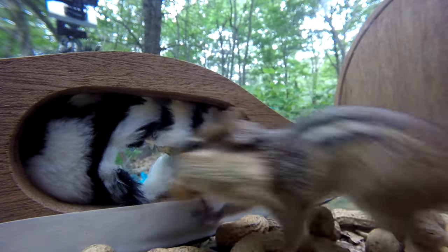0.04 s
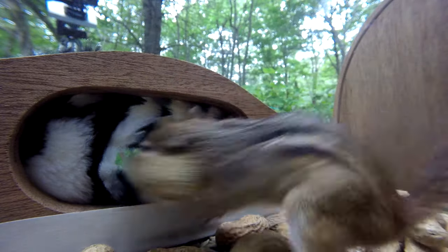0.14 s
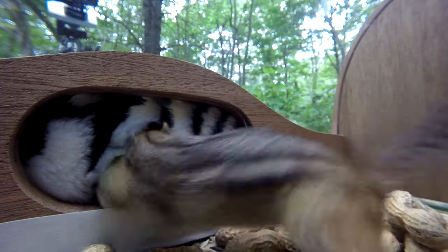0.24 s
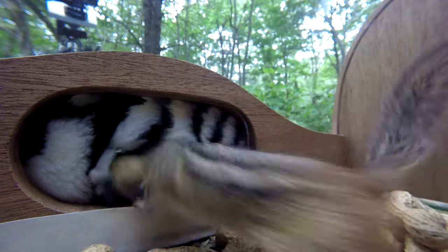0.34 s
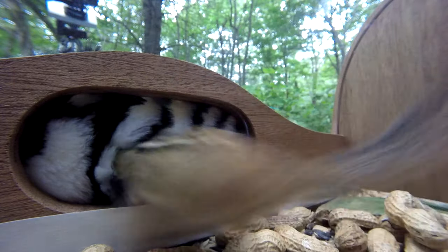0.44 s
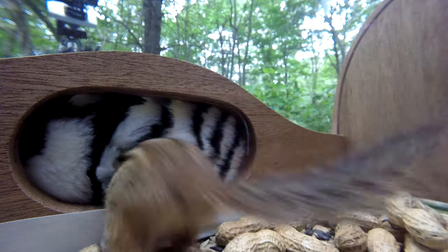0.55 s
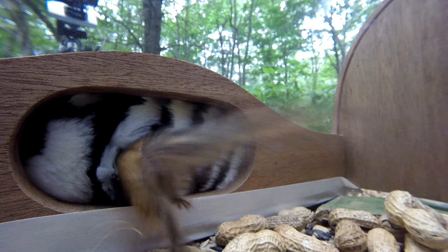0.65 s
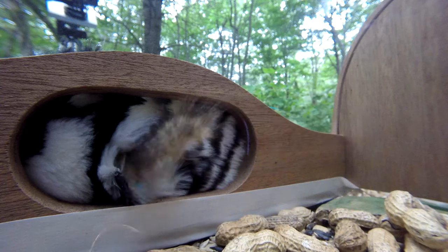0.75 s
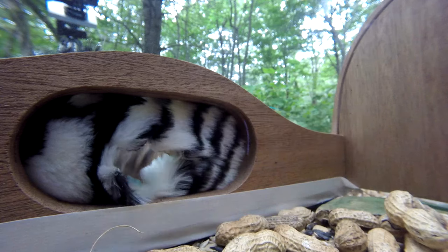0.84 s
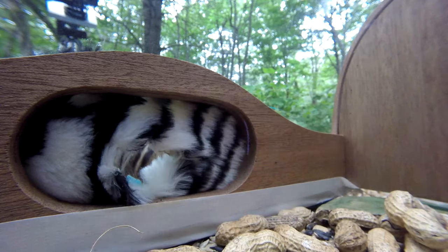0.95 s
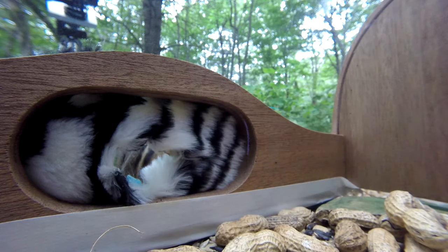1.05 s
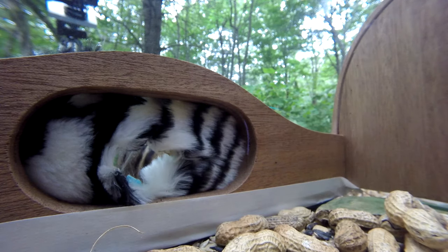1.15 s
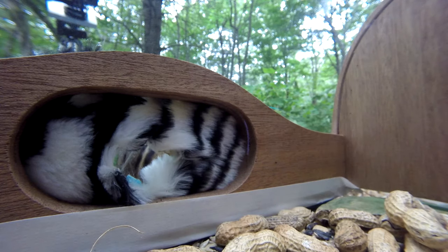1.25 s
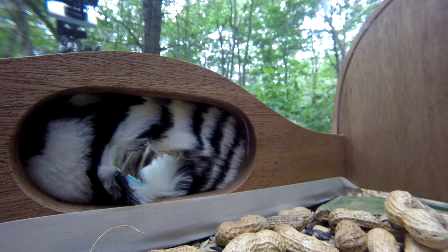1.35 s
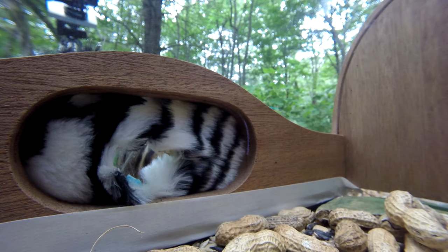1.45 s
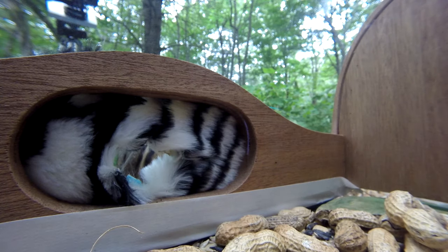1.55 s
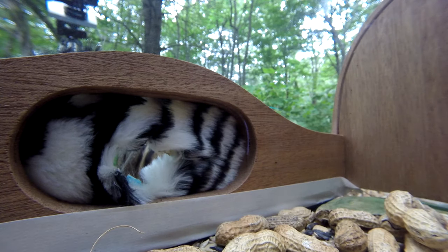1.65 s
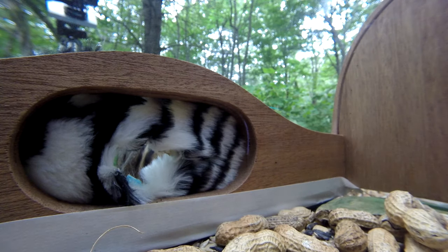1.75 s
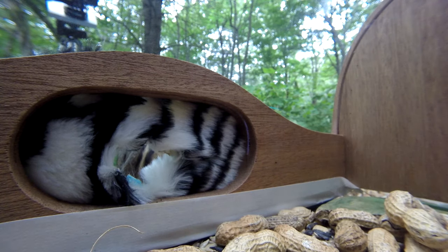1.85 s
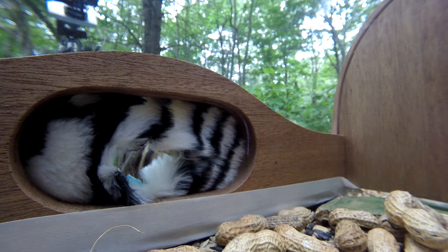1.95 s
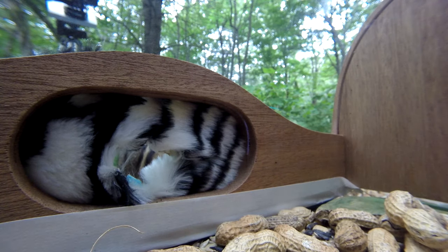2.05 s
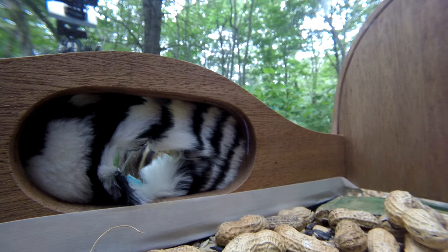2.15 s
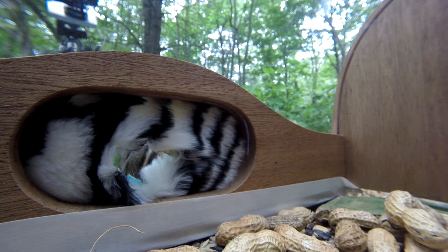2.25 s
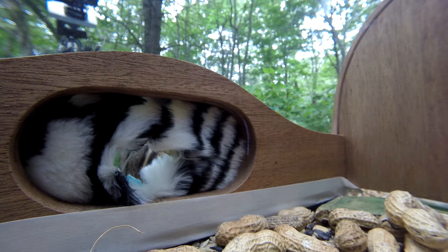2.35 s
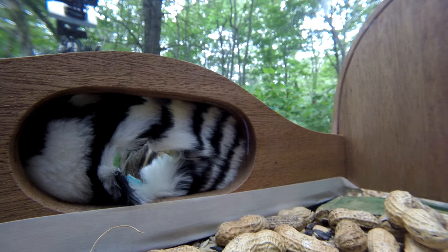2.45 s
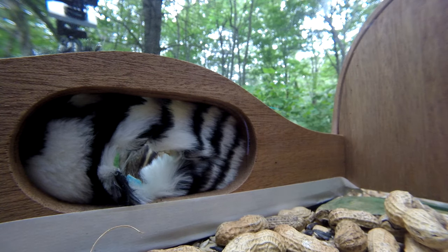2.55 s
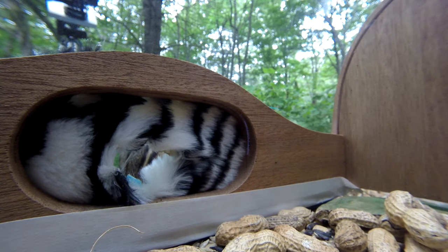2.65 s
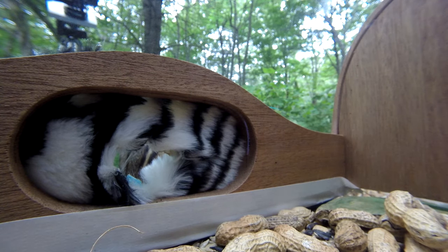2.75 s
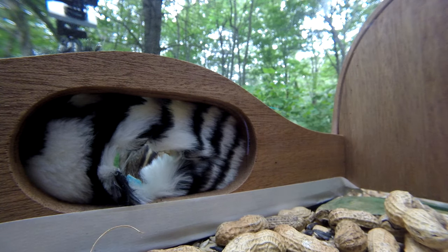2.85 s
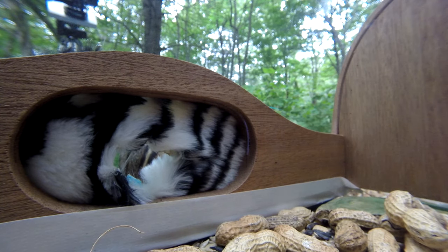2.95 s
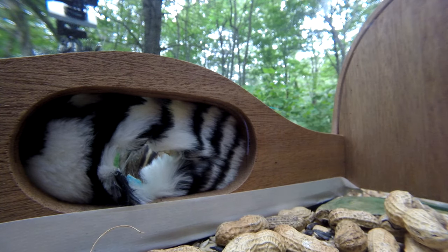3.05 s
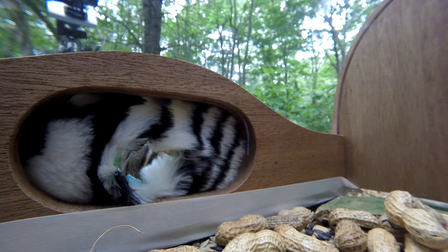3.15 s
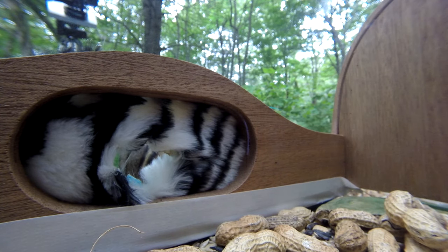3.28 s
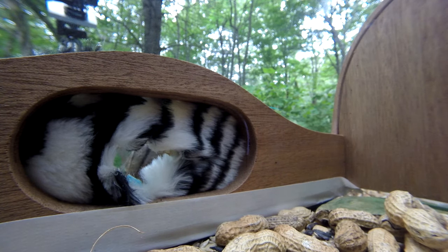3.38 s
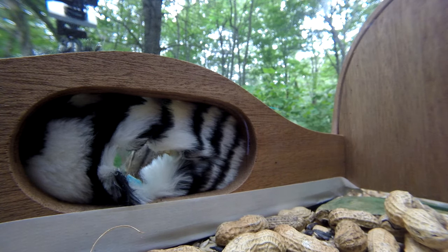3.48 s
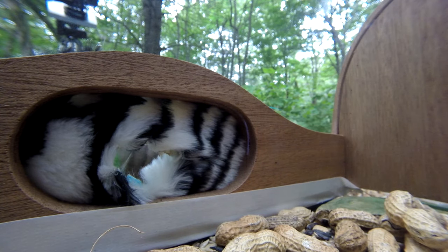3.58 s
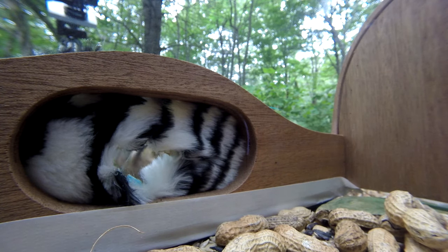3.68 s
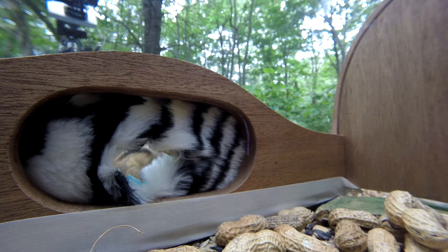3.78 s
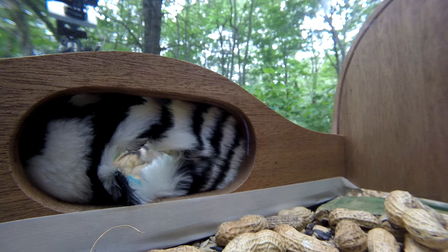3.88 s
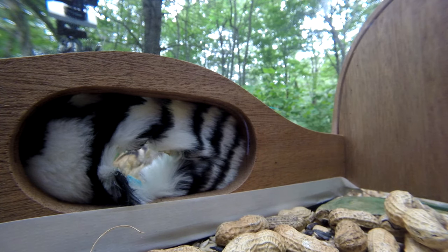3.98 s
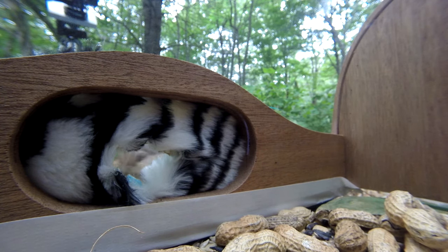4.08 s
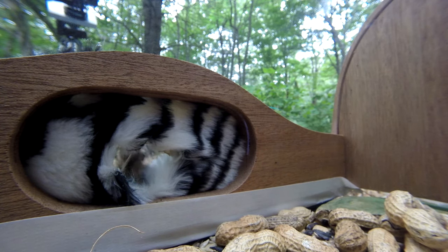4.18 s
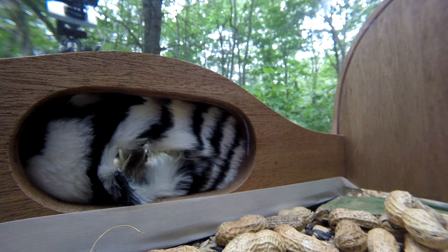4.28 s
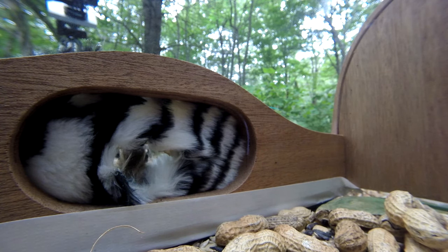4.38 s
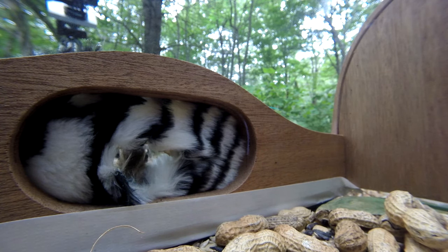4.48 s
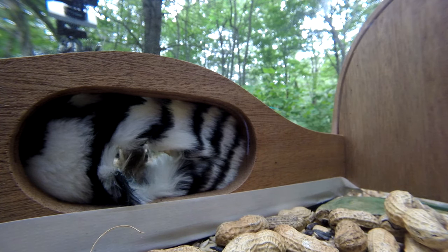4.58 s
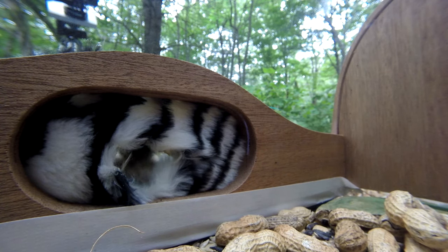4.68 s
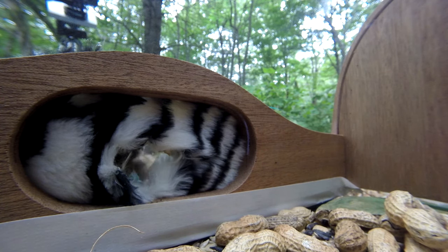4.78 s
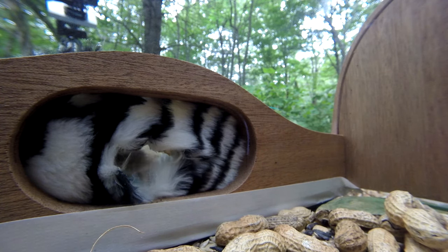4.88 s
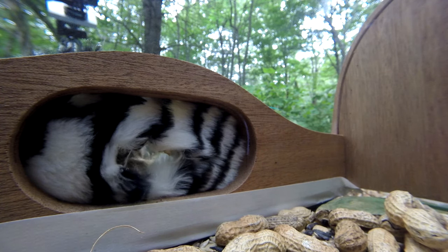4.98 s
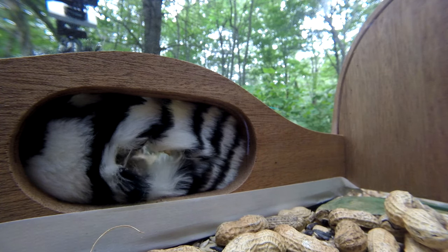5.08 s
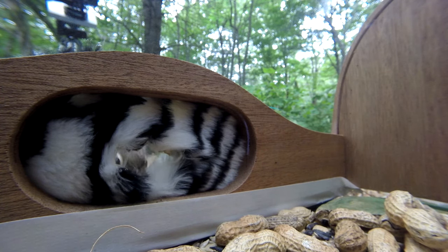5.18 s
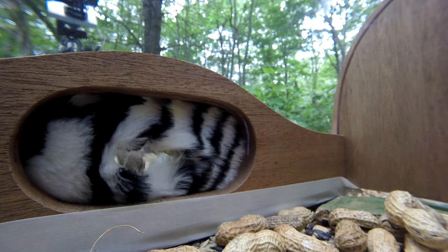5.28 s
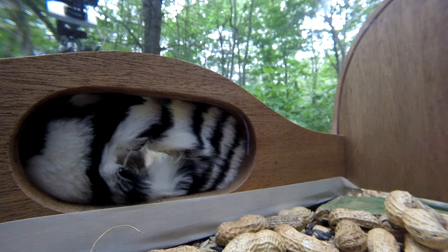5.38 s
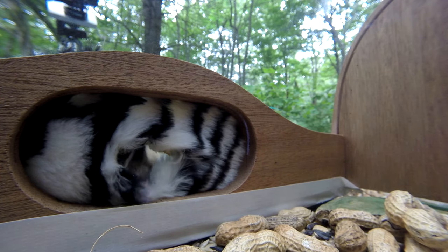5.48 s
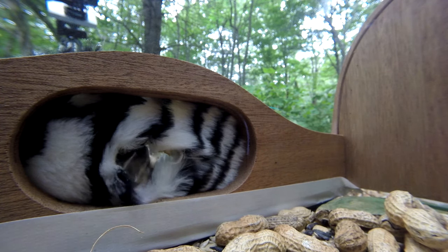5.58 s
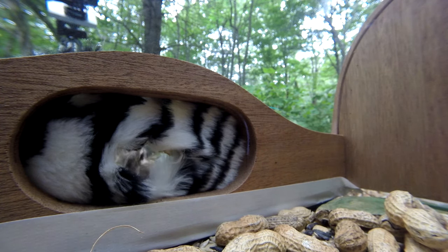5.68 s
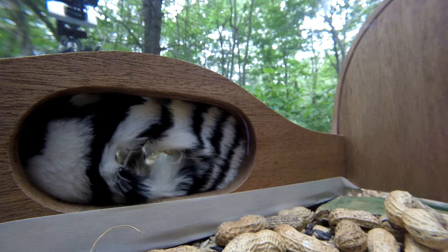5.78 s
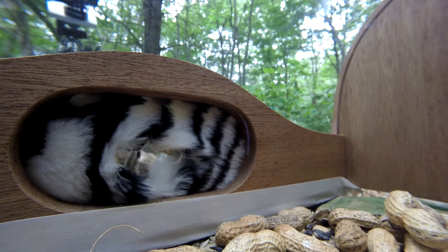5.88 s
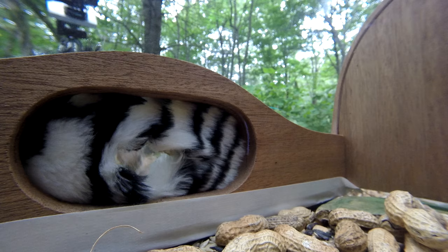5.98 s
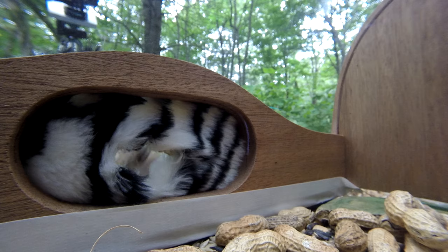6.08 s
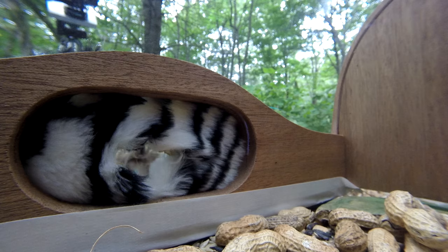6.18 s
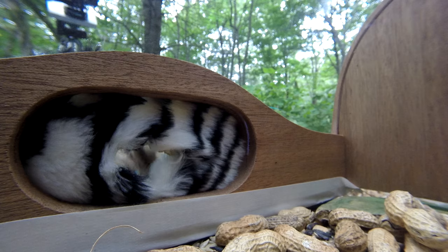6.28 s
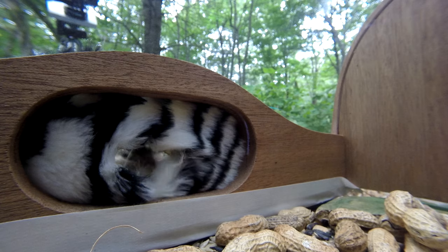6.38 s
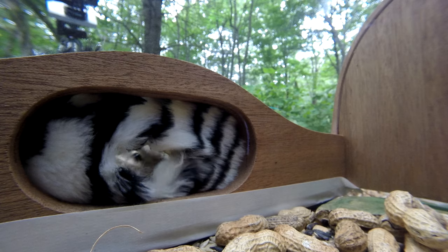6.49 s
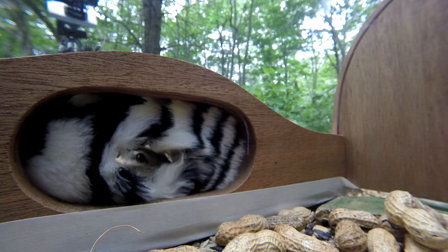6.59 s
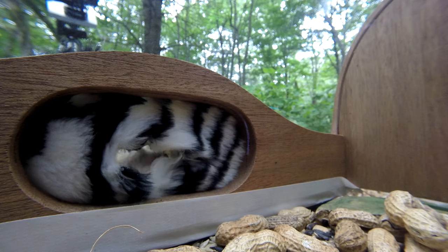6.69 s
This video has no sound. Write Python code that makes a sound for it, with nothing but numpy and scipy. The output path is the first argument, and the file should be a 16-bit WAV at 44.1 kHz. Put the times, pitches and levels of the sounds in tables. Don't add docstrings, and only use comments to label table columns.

```python
import sys
import numpy as np
from scipy import signal
from scipy.fft import rfft, irfft
from scipy.io import wavfile
from scipy.ndimage import uniform_filter1d

SR = 44100
rng = np.random.default_rng(int(sys.argv[2]) if len(sys.argv) > 2 else 0)


def persist_wave(psi):
    counts = np.round(np.clip(psi, -1, 1) * 32767).astype(np.int16)
    wavfile.write(sys.argv[1], SR, np.atleast_2d(counts).T)


def gain_from_decibels(decibels):
    exponent = np.asarray(decibels, float) / 20
    return 10 ** exponent


N = 296793

# f/Hz, density/dB
HUSH = [(20, 4), (59, -0.5), (191, -4), (404, -13), (631, -15), (1130, -20.5), (1920, -22), (12500, -45.5),
        (15600, -55)]
HUSH_DB = -48.5
# t/s, f/Hz, level/dB
BIRD = [
    [(3.1, 3200, -78), (3.17, 3240, -78), (3.27, 3380, -83)],
    [(3.42, 2580, -67), (3.45, 2720, -65), (3.49, 2780, -69), (3.56, 2860, -70), (3.72, 2800, -76)],
    [(3.43, 2520, -71), (3.53, 2560, -74)],
    [(3.63, 2400, -73), (3.72, 2380, -72)],
    [(4.36, 4300, -75), (4.42, 4310, -76)],
]

# f/Hz, level/dB, t60/s
DEEP = [(61.7, -11.5, 0.21), (75.2, -15, 0.23)]
FLOOR_BOARD = [(100, -8.5, 0.4), (135, 11, 0.1), (173.3, -0.5, 0.28), (195.8, 8.5, 0.078), (240, 1, 0.082),
               (263, -27, 0.014), (318, 10, 0.032), (400, -61, 0.035)]
SIDE_PANEL = [(300, -5.5, .04), (345, -2.5, 0.088)]
WALL = [(486.8, -2.5, 0.063), (580, -10, 0.033), (833, -0.5, 0.048), (946, -0.5, 0.034), (1020, -2, 0.043),
        (1050, -57, 0.035), (1253, -10, 0.06)]
THIN_BOARD = [(1367, -1, 0.082), (1670, -16, .02), (1713, 6, 0.047), (1950, 17.5, 0.022), (2220, 18, 0.019),
              (2300, 10, 0.016), (2480, -14, 0.082), (2600, 2.5, 0.05)]
# f/Hz, level/dB, t60/s
SHELL = [(3200, 8.5, 0.0077), (3960, 6.5, 0.0047), (4600, -8, 0.015), (4770, 19.5, 0.0031),
         (5930, 25, 0.0015), (7400, 9.5, 0.0021), (9160, 4, 0.00097), (12200, -41, 0.0013),
         (13700, -48, .002)]
HUSK = [(2600, 11, 0.021), (3195, 5.5, 0.027), (3700, 1, 0.026), (4330, -1, 0.026), (4730, 2.5, 0.013),
        (5750, -12, .01), (6240, -16, .015), (7430, -12, 0.0068), (8600, -14, .008), (10350, -16, .006)]
NUT = [(660, -9, 0.024), (980, -14, 0.02), (1530, -2, 0.017), (1610, -14, 0.011), (2370, -9, 0.011)]
TRAY = [(390, -4.5, 0.07), (490, -6, .1)]

# t/s, peak level/dB, length/ms
SKINS = [(.293, -42, 16), (3.782, -50, 10), (4.687, -48.5, 14), (4.787, -40, 16), (4.9, -44, 45),
         (5.104, -47.5, 24), (5.138, -47, 36), (5.446, -42, 20), (5.49, -42, 40), (5.582, -47, 29),
         (5.65, -48, 57), (5.821, -50, 14), (6.352, -47, 26), (6.419, -43, 45), (6.505, -49, 55),
         (6.641, -42, 50), (6.719, -35, 11)]
SKIN_LOW_HZ, SKIN_CLICKS_PER_S = 5500, 9000
# t/s, peak level/dB, length/ms, favoured f/Hz, husk level/dB re peak
BRUSHES = [(.22, -28.5, 66, 480, -6), (.25, -31, 54, 700, -7), (.51, -31, 43, 830, -12),
           (.56, -32, 79, 480, -11), (.64, -34.5, 79, 950, -4), (.72, -37.5, 85, 830, -8),
           (.858, -27, 14, 300, -16), (3.72, -40, 57, 330, -17), (3.775, -30, 35, 478, -17),
           (4.12, -33.5, 41, 330, -8), (4.69, -37, 48, 950, -9), (4.78, -28.5, 22, 464, -9),
           (4.85, -38, 81, 950, -9), (5.095, -36, 26, 950, -10), (5.22, -33, 32, 1030, -10),
           (5.395, -24, 63, 830, -20), (5.56, -29, 63, 830, -6.5), (5.62, -31, 100, 850, -13),
           (6.03, -34, 45, 490, -28), (6.11, -26.5, 32, 830, -19), (6.28, -32.5, 43, 826, -16),
           (6.39, -34, 54, 830, -20), (6.53, -29.5, 52, 830, -16), (6.59, -16, 39, 830, -26),
           (6.63, -21.5, 50, 830, -20), (6.685, -30, 32, 830, -23)]
BRUSH_CLICKS_PER_S = 4000
# t/s, peak level/dB, contact/ms, favoured f/Hz
NUDGES = [
    (.241, -21, 4, 1530),
    (6.026, -19, 12, 490),
    (.24, -24, 26, 390),
    (.308, -21.5, 3.6, 660),
    (.322, -24.5, 21, 1530),
    (.324, -23, 17, 390),
    (6.108, -17, 16, 490),
]
KICK_S, KICK_DB, KICK_MS = .396, -5.5, 6
# t/s, peak level/dB, length/ms, favoured f/Hz, wall level/dB re peak
DRAGS = [(.133, -31, 23, 2040, -17), (.212, -30, 30, 2300, -1), (.29, -26, 19, 4700, -10),
         (.362, -36, 18, 4700, -9), (3.783, -41, 23, 2400, -13), (4.139, -33, 16, 2600, -2),
         (5.183, -30.5, 10, 4500, -15), (5.251, -25, 28.5, 2300, 4.5), (5.443, -25, 19, 2400, 4),
         (5.47, -30.5, 56, 4600, -13), (5.542, -28, 11, 2300, 8), (5.59, -32, 22.4, 3200, -3),
         (5.89, -32, 35, 4600, -5), (6.433, -26, 15, 2480, -7), (6.452, -29, 21, 1970, 5),
         (6.572, -32, 15, 2200, 5), (6.595, -23, 26, 3220, -4), (6.625, -38, 48, 2200, 3),
         (6.655, -26.5, 36, 2500, 7.5), (6.695, -35, 16, 2300, 6)]
DRAG_CLICKS_PER_S, DRAG_SWELL = 2700, 0.61

# t/s, level/dB
SCRABBLE = [
    [(0.0, -44), (.102, -59), (.198, -34.5), (.312, -30.5), (.42, -36), (.538, -41.5), (.72, -39.5),
     (.83, -49.5), (1.05, -68)],
    [(3.64, -83), (3.7, -59), (3.848, -54), (3.998, -74), (4.146, -46), (4.3, -76)],
    [(4.68, -62), (4.72, -40.5), (4.83, -43), (4.88, -47), (4.95, -37.5), (5.06, -56.5)],
    [(5.23, -41), (5.39, -37.5), (5.43, -42.5), (5.5, -39), (5.61, -42.5), (5.64, -51), (5.7, -47),
     (5.8, -59.5)],
    [(5.86, -45), (5.92, -45), (6.04, -66), (6.2, -62), (6.3, -54), (6.39, -38.5), (6.53, -46.5),
     (6.73, -41.5)],
]
FLOOR_DB = 0.5
RUSTLE_DB, RUSTLE_FOLLOWS = -59.5, 0.77
SHAKE_DB, SHAKE_S = -26, 0.041
TUNNEL_S, TUNNEL_FLOOR_DB = .9, 5.5
THIN_OPEN, THIN_TUNNEL = 0.57, 0.66
DEEP_OPEN, DEEP_TUNNEL = .1, .27

# t/s, peak level/dB, deep level/dB re peak, push/ms, favoured f/Hz
LANDINGS = [(0.142, -33, -17, 7.7, 164), (0.519, -22, -12, 2.5, 115), (0.588, -25.5, -8, 7.1, 185),
            (0.683, -28, 3.5, 15, 161), (.852, -14, 3.5, 9.7, 130), (.874, -17.5, 8.5, 3.2, 144),
            (3.721, -27, -8, 7, 135), (3.756, -26.5, -0.5, 4.4, 182), (3.787, -18.5, -2.5, 1.5, 111),
            (4.094, -24, -6, 8.7, 160), (4.131, -14.5, -3.5, 2.93, 106), (4.703, -26.5, 0.5, 6.1, 184),
            (4.787, -15, -11, 3.2, 175), (4.816, -18.5, -3, 6.7, 127), (4.934, -21, -4.5, 2.3, 192),
            (6.002, -18.5, 0.5, 1.2, 113), (6.337, -25, -4, 4.1, 135), (6.361, -21, -0.5, 2.4, 104),
            (6.515, -32.5, 1, 7.6, 240)]
LANDING_TOES_DB = -13.5
# t/s, peak level/dB, push/ms, favoured f/Hz, toe level/dB re peak
PAWS = [(0.202, -23, 5.7, 193, -11), (0.256, -20.5, 4.4, 165, -9), (0.326, -14.5, 5.2, 169.6, -15),
        (0.35, -38, 3.1, 127, -7), (0.769, -29, 10.4, 193, -3), (4.967, -15, 1.47, 159, -28),
        (5.138, -35, 5.7, 179, -16), (5.192, -16, 2.8, 226, -17), (5.414, -33, 17, 305, -13),
        (5.451, -16.5, 3.9, 252, -11), (5.495, -14.5, 5.3, 189, -9), (5.55, -1, 3.37, 165, -9),
        (5.587, -19.5, 4.2, 134, -10), (5.696, -14.5, 3.6, 225, -14), (5.88, -8, 2.9, 205, -33),
        (6.024, -4.5, 1.78, 156, -21), (6.106, -8.5, 5.06, 238, -20), (6.112, -2.5, 1.04, 132, -23),
        (6.31, -28, 0.86, 137, -15), (6.441, -17.5, 3.1, 200, -10), (6.586, -4.5, 2.28, 182, -16),
        (6.601, -26, 2.6, 190, -11), (6.681, -7, 2.04, 168, -11)]
PAW_DEEP_DB = -26.5

# t/s, peak level/dB, contact/ms, favoured f/Hz, brightness/dB
DULL_KNOCKS = [(.535, -22.5, 13.4, 810, -7), (.747, -31, 8.7, 805, -8), (.763, -26, 3.8, 755, -6),
               (3.779, -29, 13.4, 1100, 2), (4.213, -37, 5.6, 1030, -7), (6.583, -9.5, 13.4, 824, -9),
               (4.786, -24, 12, 1050, 2), (4.812, -21.5, 5.8, 880, -1), (4.912, -27.5, 15, 960, 3),
               (5.108, -30.5, 12, 1030, 2), (5.176, -25.5, 15, 1020, -1), (5.298, -14, 6.8, 920, -19),
               (5.422, -27, 8, 1060, -14), (5.457, -11.5, 4.8, 980, -2), (5.488, -22, 15, 885, -7),
               (5.502, -18, 9.3, 990, 0.5), (5.698, -23.5, 5.5, 920, 3), (5.862, -40, 6.6, 1030, 2),
               (5.876, -8, 7.3, 1020, 2.5), (5.914, -29.5, 8.4, 1040, -2), (6.127, -25, 6.4, 950, 1.5),
               (6.206, -28, 13, 1050, 1), (6.292, -29.5, 10, 1070, -1), (6.316, -25.5, 6, 854, -0.5),
               (6.383, -26, 6.4, 806, -2), (6.522, -22.5, 5.3, 840, -5), (6.539, -31, 26, 800, 9),
               (6.611, -18, 8.8, 1020, -2), (6.68, -8, 6.7, 880, -6), (6.721, -16, 8.6, 1000, -2)]
HARD_KNOCKS = [(.381, -34, 24, 1600, 2), (.522, -28, 9.7, 990, -2), (.578, -25.5, 7.8, 815, 2),
               (.852, -33.5, 21, 1060, 6.5), (1.144, -39.5, 4.4, 940, 1), (4.134, -28, 13, 960, -2),
               (4.69, -41.5, 43, 1030, 4), (4.729, -29, 5.8, 980, -5), (4.927, -25.5, 24.6, 806, 0.5),
               (4.963, -14.5, 19, 1050, -3.5), (4.982, -15.5, 12, 800, -4.5), (5.009, -27, 10, 840, -4),
               (5.145, -29.5, 6.8, 824, -1), (5.194, -16.5, 8, 1020, -3), (5.239, -23, 5.1, 1060, -9),
               (5.262, -18.5, 11, 1020, -3), (5.357, -18.5, 7.4, 980, -3), (5.553, -6, 4.5, 940, 0),
               (5.585, -18, 25, 1050, -6), (6.009, -19, 6.7, 824, -7), (6.023, -8, 6.4, 1950, -4),
               (6.074, -40, 5.2, 1030, -4), (6.111, -11.5, 4, 830, -4), (6.361, -28, 12, 980, 4.5),
               (6.424, -24.5, 17, 1050, -10), (6.443, -13, 8.7, 870, 1.5), (6.509, -28.5, 24, 1050, -2),
               (6.6, -23.5, 12.5, 2080, 6.5)]
THIN_KNOCKS = [
    (.322, -26, 4.3, 1530, 6),
    (.397, -20, 5, 2300, 9),
    (.503, -28.5, 11, 2210, 3.5),
    (.699, -33.5, 12, 872, 6),
    (1.824, -42.5, 4.6, 853, -2),
    (2.395, -46.5, 11, 1930, -1),
    (5.965, -8.5, 13.6, 2200, -7.5),
    (6.091, -23, 30, 2200, -1),
]
CRUNCHES = [
    (.241, -18.5, 5, 1670, -3),
    (.258, -24.5, 11, 996, -8),
    (.626, -25.5, 19.6, 1850, -5.5),
    (5.213, -29, 11.7, 2220, 1.5),
    (5.322, -20, 14, 2600, 0),
    (5.374, -17, 18.5, 2500, 0),
]
SHELL_CLACKS = [(.122, -34.5, 25, 1050, 1), (.144, -27.5, 9.4, 1130, -2.5), (.203, -31, 46, 880, 0),
                (.308, -20, 4.2, 815, -5), (.334, -28, 39, 826, -4.5), (.353, -32, 5, 806, 7.5),
                (.603, -36, 30, 955, -1.5), (3.708, -34.5, 6.1, 1020, -4.5), (3.744, -42, 9.9, 875, -6),
                (3.905, -49, 20, 880, -5), (4.012, -55, 18, 851, -2)]
# t/s, peak level/dB, contact/ms, favoured f/Hz
LOW_KNOCKS = [
    (.855, -25.5, 4.6, 480),
    (3.79, -35, 24, 488),
    (4.13, -35, 16, 480),
    (5.7, -26, 7.7, 510),
    (6.03, -16, 6.1, 486),
    (6.108, -14, 10, 504),
]
# t/s, peak level/dB
TICKS = [
    (.062, -49),
    (1.209, -48),
    (1.582, -47),
    (3.301, -48),
    (3.519, -47.5),
    (4.103, -45),
    (4.865, -59),
]
# t/s, peak level/dB
SNAPS = [
    (.024, -47.5),
    (.08, -51),
    (.2, -36.5),
    (.268, -32),
    (.512, -49),
    (4.198, -66),
    (4.215, -53),
    (5.472, -41),
    (5.801, -49.5),
]
TICK_MS, TICK_HZ = 4.3, 870
# wall level/dB, thin-board level/dB, crack level/dB, hiss level/dB, lowest shell f/Hz
DULL = (-1.5, -14.5, -17, -56, 3501)
HARD = (-1, -5, -15, -17.5, 3295)
THIN = (-8, -3.5, -17, -19.5, 3498)
CRUNCH = (-7, 1.5, -1.5, -10.5, 3000)
CLACK = (-2, -4, 1.5, -2.5, 4200)
TICK = (0, -17, -4.5, -17, 3500)
SNAP = (-34, -15, 9, 10, 5000)
LOW = (0, -31, -25, -54, 3496.5)
BRIGHT_THIN_SHARE = 0.65
RATTLE_DB, RATTLE_S = -5, .02

MUFFLE_S, MUFFLED_HZ, MUFFLED_SHARE = 6.47, (1220, 1850), 0.76
MIC_LOW_HZ, TOP_HZ = 27.6, 15950
GAIN_KNEE_DB, GAIN_RATIO, GAIN_RELEASE_DB_S = -20, 0.048, 62


def rms_one(x):
    return x / np.sqrt(np.mean(x ** 2) + 1e-20)


def drift(rate_hz):
    r = np.exp(-2 * np.pi * rate_hz / SR)
    return rms_one(signal.lfilter([1], [1, -2 * r, r * r], rng.standard_normal(N + SR))[SR:])


def soften(force, top_hz):
    return signal.sosfilt(signal.butter(2, top_hz, fs=SR, output="sos"), force)


def ring(force, hz, t60):
    r, w = gain_from_decibels(-60 / (t60 * SR)), 2 * np.pi * hz / SR
    return signal.lfilter([1, -1], [1, -2 * r * np.cos(w), r * r], force + 1e-18) * np.cos(w / 2)


def body(force, modes):
    return rms_one(sum(gain_from_decibels(db) * ring(force, hz, t60) for hz, db, t60 in modes))


def strike(times, peak_db, force, modes, favoured_hz, focus_db, spread_db):
    luck = spread_db * rng.standard_normal((len(times), len(modes)))
    rows = 0
    for k, (hz, db, t60) in enumerate(modes):
        near = np.exp(-(np.log2(hz / favoured_hz) / .18) ** 2)
        gain = gain_from_decibels(db + focus_db * near + luck[:, k])
        rows = rows + gain[:, None] * ring(force, hz, t60)
    rows = rows / np.abs(rows).max(axis=1, keepdims=True) * gain_from_decibels(peak_db)[:, None]
    out = np.zeros(N + force.shape[1])
    for s, row in zip(times, rows):
        start = round(s * SR)
        out[start:start + len(row)] += row
    return out[:N]


def progress(length_ms, seconds):
    return np.arange(int(seconds * SR)) / SR / (np.asarray(length_ms)[:, None] / 1000)


def rough(shape, share):
    return rng.laplace(size=shape) * (rng.random(shape) < share)


def hush():
    hz = np.fft.rfftfreq(N, 1 / SR) + 1
    point_hz, point_db = np.transpose(HUSH)
    shape = gain_from_decibels(np.interp(np.log(hz), np.log(point_hz), point_db))
    noise = irfft(rfft(rng.standard_normal(N)) * shape, N)
    return gain_from_decibels(HUSH_DB + 0.13 * drift(7.5)) * rms_one(noise)


def bird():
    out, t = np.zeros(N), np.arange(N) / SR
    waver = 1 + .018 * drift(60)
    for note in BIRD:
        s, hz, level_db = np.transpose(note)
        edge = np.clip(np.minimum(t - s[0], s[-1] - t) / 0.0082, 0, 1)
        turns = np.cumsum(np.interp(t, s, hz) * waver) / SR
        out += edge * gain_from_decibels(np.interp(t, s, level_db) + 4.0) * np.sin(2 * np.pi * turns)
    out *= gain_from_decibels(2.2 * drift(30))
    return out + 0.32 * np.roll(out, 900) + 0.59 * np.roll(out, 2100)


def skins():
    s, peak_db, length_ms = np.transpose(SKINS)
    phase = progress(length_ms, 1 / 8)
    swell = np.minimum(phase / 0.14, 1) * np.exp(-phase ** 3)
    clicks = swell * rough(phase.shape, SKIN_CLICKS_PER_S / SR)
    clicks = signal.sosfilt(signal.butter(2, SKIN_LOW_HZ, "high", fs=SR, output="sos"), clicks)
    modes = SHELL[5:7] + [(12500, -5, .001)]
    return strike(s, peak_db, clicks, modes, 7400, focus_db=0, spread_db=4)


def brushes():
    s, peak_db, length_ms, hz, husk_db = np.transpose(BRUSHES)
    phase = progress(length_ms, 1 / 8)
    stroke = np.sin(np.pi * np.minimum(phase, 1))
    clicks = stroke * rough(phase.shape, BRUSH_CLICKS_PER_S / SR)
    walls, husks = soften(clicks, top_hz=1100), soften(clicks, top_hz=7000)
    return (strike(s, peak_db, walls, SIDE_PANEL + WALL[:5], hz, focus_db=10, spread_db=0)
            + strike(s, peak_db + husk_db, husks, HUSK, 5100, focus_db=6, spread_db=4))


def nudges():
    s, peak_db, contact_ms, hz = np.transpose(NUDGES)
    phase = progress(contact_ms, 1 / 10)
    force = np.sin(np.pi * np.minimum(phase, 1)) * rng.laplace(size=phase.shape)
    return strike(s, peak_db, soften(force, top_hz=2600), TRAY + NUT, hz, focus_db=10, spread_db=0)


def kicked_nut():
    phase = progress([KICK_MS], 1 / 10)
    force = np.sin(np.pi * np.minimum(phase, 1)) * rng.standard_normal(phase.shape)
    force = soften(soften(force, top_hz=2600), top_hz=2600)
    return strike([KICK_S], np.array([KICK_DB]), force, NUT, 1500, focus_db=0, spread_db=0.5)


def drags():
    s, peak_db, length_ms, hz, wall_db = np.transpose(DRAGS)
    phase = progress(length_ms, 1 / 10)
    swell = np.interp(phase, [0, DRAG_SWELL, 1], [.2, 1, 0])
    clicks = swell * rough(phase.shape, DRAG_CLICKS_PER_S / SR)
    bright, dull = soften(clicks, top_hz=9000), soften(clicks, top_hz=1400)
    return (strike(s, peak_db, bright, THIN_BOARD[3:] + HUSK, hz, focus_db=10, spread_db=4)
            + strike(s, peak_db + wall_db, dull, WALL, 1070, focus_db=10, spread_db=4))


def thump_rows():
    landings = [row + (LANDING_TOES_DB,) for row in LANDINGS]
    paws = [(s, db, PAW_DEEP_DB, ms, hz, toes_db) for s, db, ms, hz, toes_db in PAWS]
    return np.transpose(landings + paws)


def shake():
    s, peak_db = thump_rows()[:2]
    blows = np.zeros(N)
    blows[(s * SR).astype(int)] = gain_from_decibels(peak_db + SHAKE_DB)
    return signal.lfilter([1], [1, -np.exp(-1 / (SHAKE_S * SR))], blows)


def grains(per_s, size_db, clump_db):
    sizes = gain_from_decibels(size_db * np.minimum(rng.exponential(1, N), 4)) * rng.choice([-1, 1], N)
    return sizes * (rng.random(N) < per_s / SR) * gain_from_decibels(clump_db * drift(22.6))


def scrabble():
    t = np.arange(N) / SR
    s, level_db = np.transpose([row for bout in SCRABBLE for row in bout])
    effort_db = np.interp(t, s, level_db)
    rustle_db = RUSTLE_DB + RUSTLE_FOLLOWS * (effort_db + 40.0)
    inside = t > TUNNEL_S
    claws = grains(1400, size_db=2.0, clump_db=4)
    fur = grains(6000, size_db=2.0, clump_db=4)
    weight = soften(grains(900, size_db=3.0, clump_db=3), top_hz=272)
    thin_share = np.where(inside, THIN_TUNNEL, THIN_OPEN)
    deep_share = np.where(inside, DEEP_TUNNEL, DEEP_OPEN)
    thin = body(soften(claws, top_hz=3060), THIN_BOARD)
    boards = body(soften(claws, top_hz=1240), WALL) - thin_share * thin
    floor = body(weight, FLOOR_BOARD) + deep_share * body(weight, DEEP)
    floor_level = gain_from_decibels(effort_db + FLOOR_DB + TUNNEL_FLOOR_DB * inside) + shake()
    rustle = body(soften(fur + 1.6 * claws, top_hz=12000), SHELL)
    return gain_from_decibels(effort_db - 4.5) * boards + floor_level * floor + gain_from_decibels(rustle_db) * rustle


def thumps():
    s, peak_db, deep_db, push_ms, hz, toes_db = thump_rows()
    t = np.arange(SR // 4) / SR
    push = np.sin(np.pi * np.minimum(progress(np.clip(3.23 * push_ms, 1, 40), 1 / 4), 1))
    rocking = soften(push * np.sin(2 * np.pi * hz[:, None] * t), top_hz=1500)
    pads = soften(push * soften(rng.standard_normal(push.shape), top_hz=566), top_hz=1500)
    deep = push * np.sin(2 * np.pi * 70 * t)
    return (strike(s - .002, peak_db, rocking, FLOOR_BOARD, hz, focus_db=0, spread_db=4)
            + strike(s, peak_db + toes_db, pads, FLOOR_BOARD[4:] + WALL[:2], hz, focus_db=0, spread_db=4)
            + strike(s, peak_db + deep_db, deep, DEEP, hz, focus_db=0, spread_db=4))


def knock_rows():
    ticks, snaps = [[(s, db, TICK_MS, TICK_HZ, 0) for s, db in rows] for rows in (TICKS, SNAPS)]
    low_knocks = [row + (0,) for row in LOW_KNOCKS]
    kinds = [(DULL_KNOCKS, DULL), (HARD_KNOCKS, HARD), (THIN_KNOCKS, THIN), (CRUNCHES, CRUNCH),
             (SHELL_CLACKS, CLACK), (ticks, TICK), (snaps, SNAP), (low_knocks, LOW)]
    tilt = np.array([0, BRIGHT_THIN_SHARE, 1, 1])
    return np.transpose([(s, ms, hz, *(db + np.array(kind[:4]) + bright_db * tilt), kind[4])
                         for rows, kind in kinds for s, db, ms, hz, bright_db in rows])


def knocks():
    s, contact_ms, hz, wall_db, thin_db, crack_db, husk_db, lowest_hz = knock_rows()
    phase = progress(np.clip(contact_ms, .5, 40), 1 / 10)
    onset = np.minimum(phase, 1)
    skid = np.minimum(phase / .2, 1) * np.exp(-phase ** 2.5)
    fade = skid + gain_from_decibels(1.5) * onset * np.exp(-phase / 0.86)
    force = fade * rough(phase.shape, .3)
    rattle_fade = gain_from_decibels(RATTLE_DB) * onset * np.exp(-np.arange(SR // 10) / SR / RATTLE_S)
    rattle = force + rattle_fade * rough(phase.shape, .15)
    shell_hz = lowest_hz * 2.0 ** rng.random(len(s))
    wall, thin = soften(force, top_hz=1400), soften(force, top_hz=2710)
    crack, hiss = soften(rattle, top_hz=7040), np.minimum(phase / 0.62, 1) * rattle
    return (strike(s, wall_db, wall, WALL, hz, focus_db=9.5, spread_db=1.5)
            - strike(s, thin_db, thin, THIN_BOARD, hz, focus_db=10, spread_db=4)
            + strike(s, crack_db, crack, SHELL[:5], shell_hz, focus_db=1.5, spread_db=4)
            + strike(s, husk_db, hiss, SHELL[5:], 2 * shell_hz, focus_db=0, spread_db=4))


def muffle(box):
    muffled = np.clip((np.arange(N) / SR - MUFFLE_S) / .03, 0, 1)
    band = signal.sosfilt(signal.butter(1, MUFFLED_HZ, "band", fs=SR, output="sos"), box)
    return box - MUFFLED_SHARE * muffled * band


def scene():
    far = hush() + bird()
    litter = skins() + brushes() + nudges() + kicked_nut()
    boards = muffle(drags() + scrabble() + knocks())
    return (far + litter + boards + thumps())[None]


def roll_off(x):
    return signal.sosfilt(signal.butter(12, 15630, fs=SR, output="sos"), x)


def record(dry):
    heard = signal.sosfilt(signal.butter(2, MIC_LOW_HZ, "high", fs=SR, output="sos"), dry)
    slope = GAIN_RELEASE_DB_S * np.arange(N) / SR
    level_db = 10 * np.log10(uniform_filter1d(heard[0] ** 2, size=441) + 1e-12)
    held_db = np.maximum.accumulate(level_db + slope) - slope
    over_db = np.maximum(held_db - GAIN_KNEE_DB, 0)
    cut_db = signal.lfilter([.002], [1, -.998], GAIN_RATIO * over_db)
    limited = np.clip(heard * gain_from_decibels(-cut_db), -.95, .95)
    mix = signal.sosfilt(signal.cheby2(10, 60, TOP_HZ, fs=SR, output="sos"), limited)
    return roll_off(mix)


dry = scene()
out = record(dry)
persist_wave(out)
```